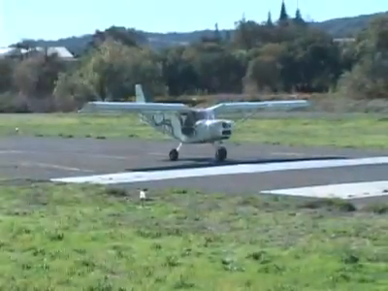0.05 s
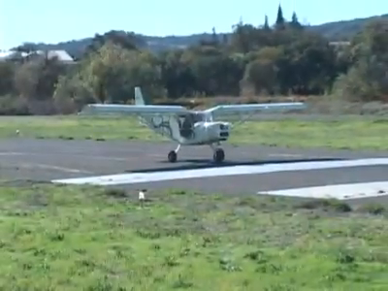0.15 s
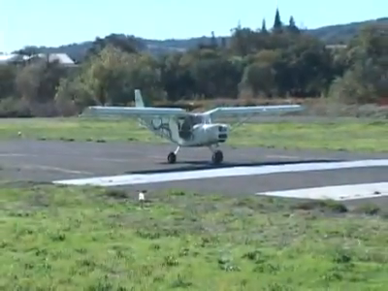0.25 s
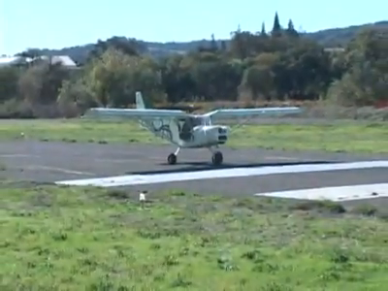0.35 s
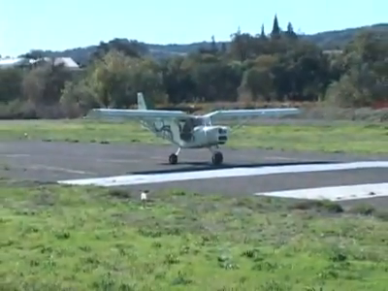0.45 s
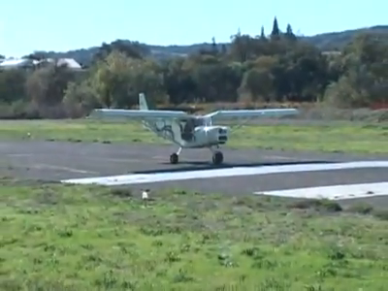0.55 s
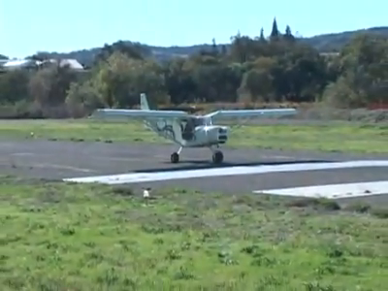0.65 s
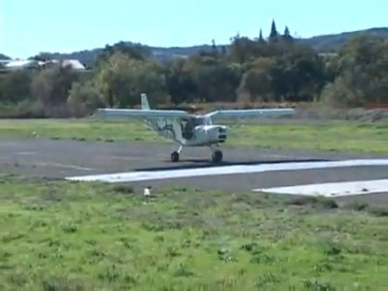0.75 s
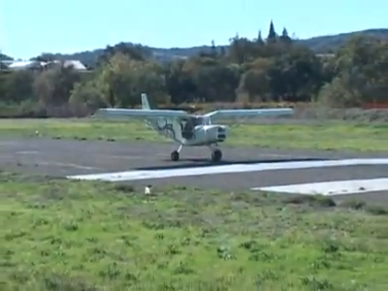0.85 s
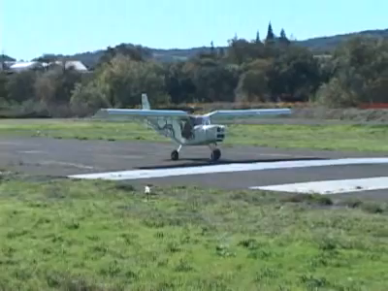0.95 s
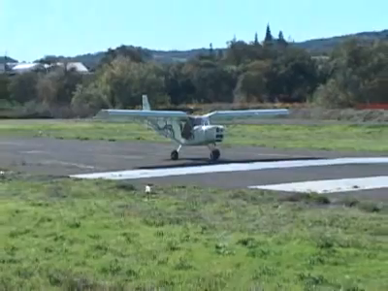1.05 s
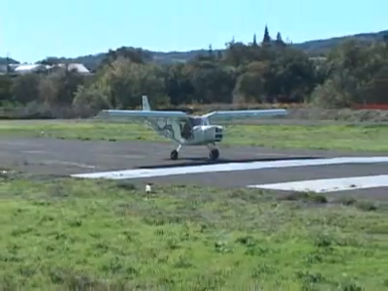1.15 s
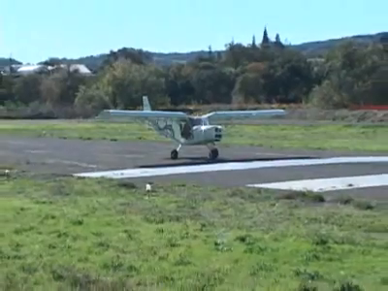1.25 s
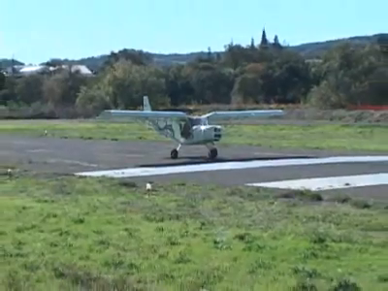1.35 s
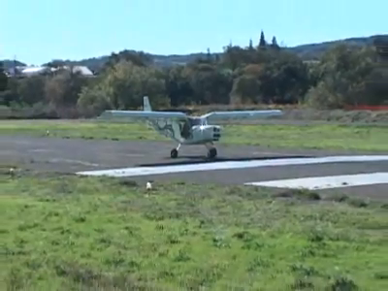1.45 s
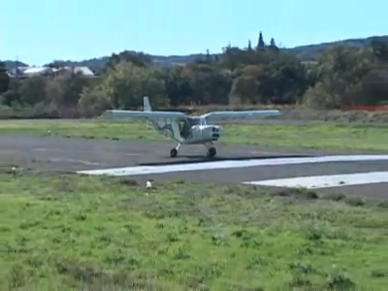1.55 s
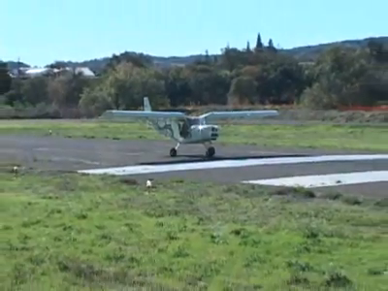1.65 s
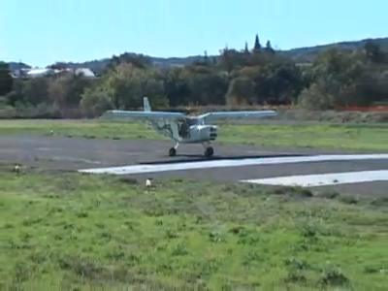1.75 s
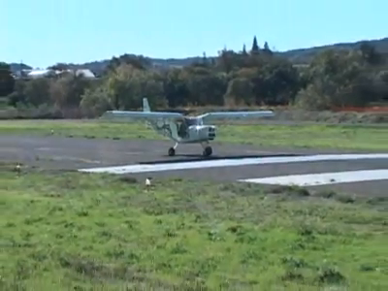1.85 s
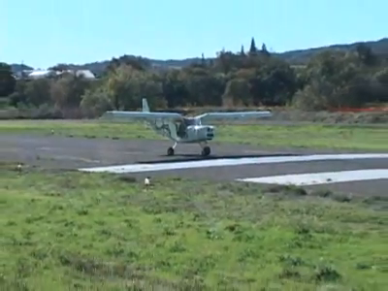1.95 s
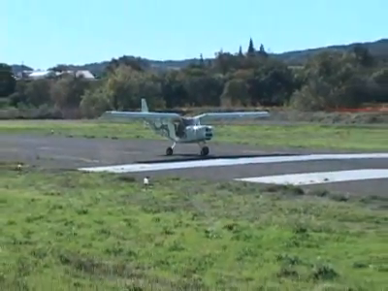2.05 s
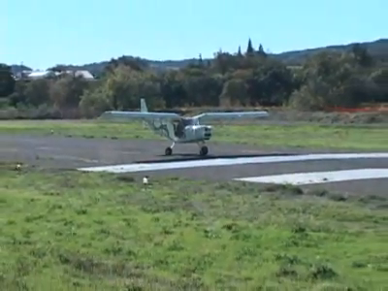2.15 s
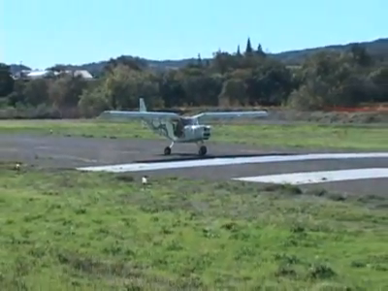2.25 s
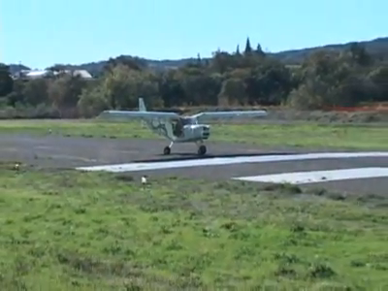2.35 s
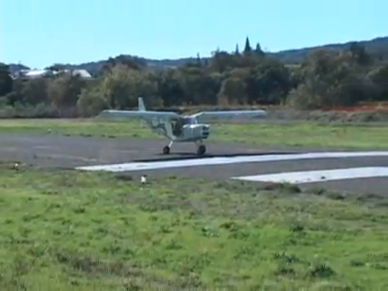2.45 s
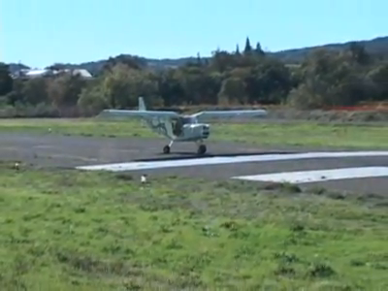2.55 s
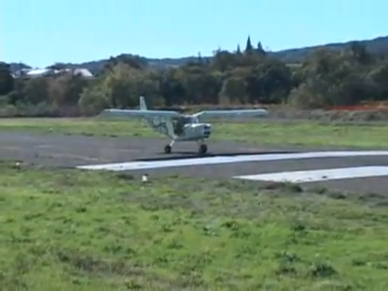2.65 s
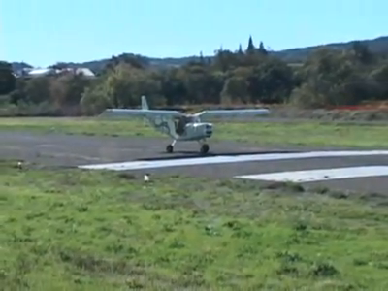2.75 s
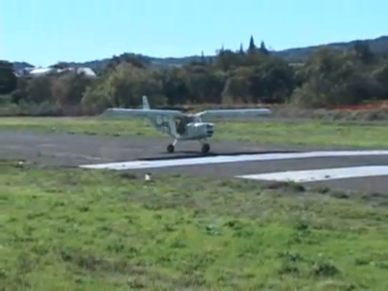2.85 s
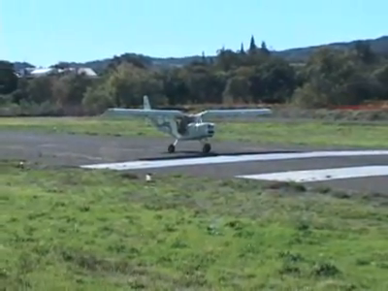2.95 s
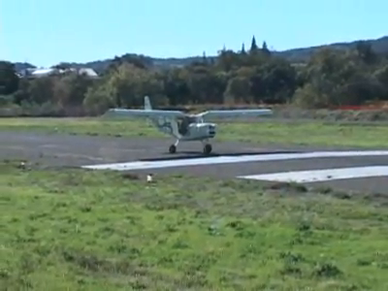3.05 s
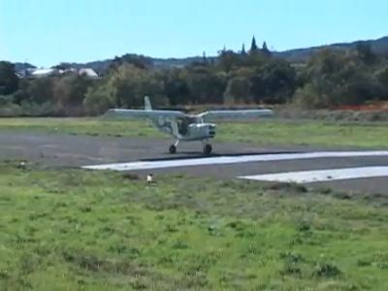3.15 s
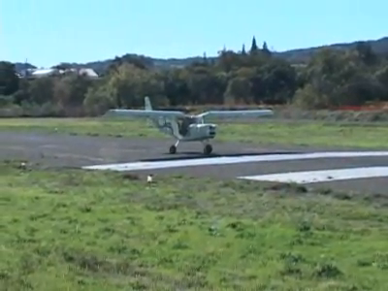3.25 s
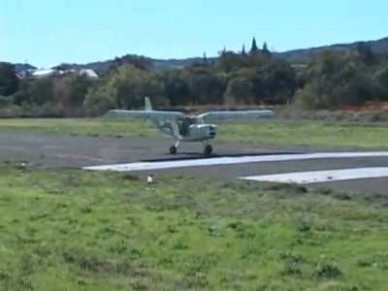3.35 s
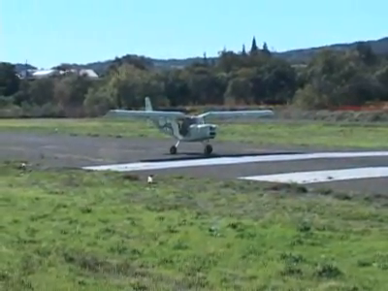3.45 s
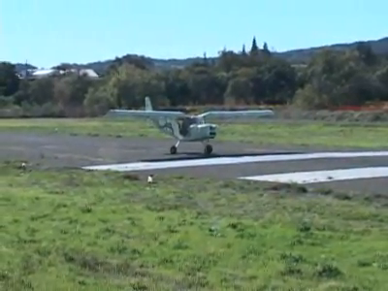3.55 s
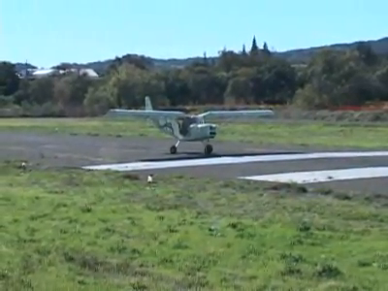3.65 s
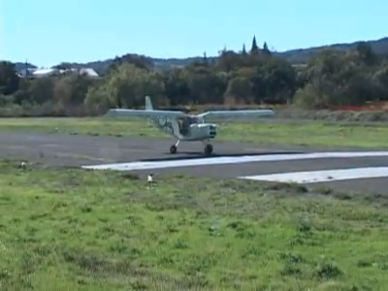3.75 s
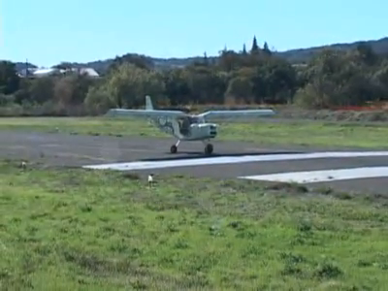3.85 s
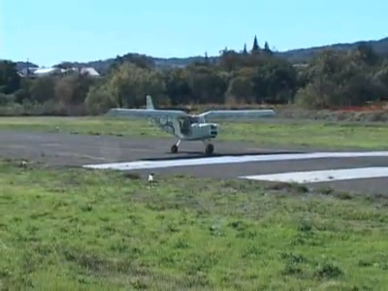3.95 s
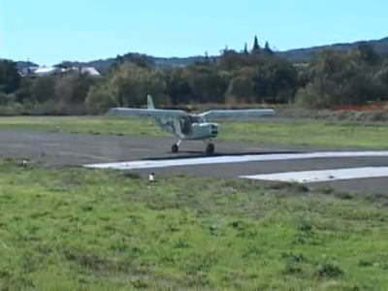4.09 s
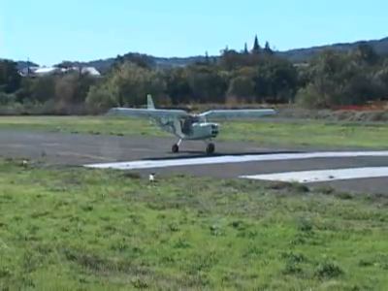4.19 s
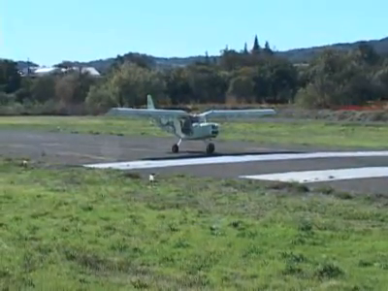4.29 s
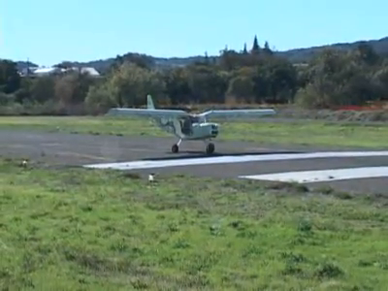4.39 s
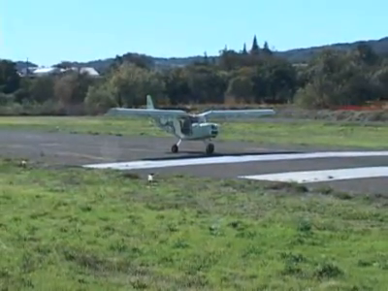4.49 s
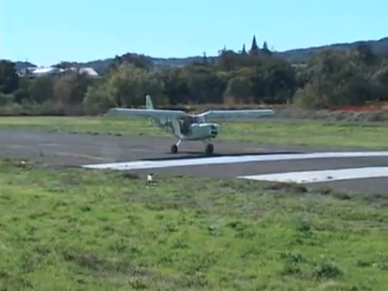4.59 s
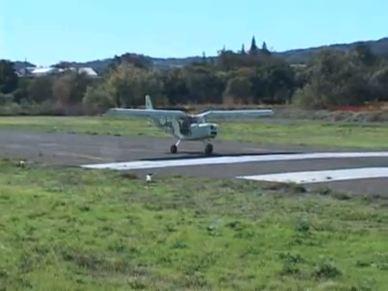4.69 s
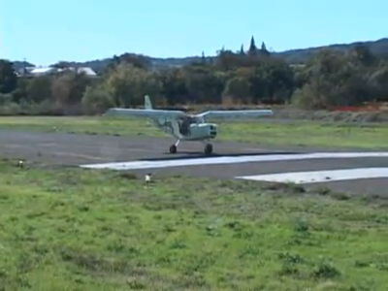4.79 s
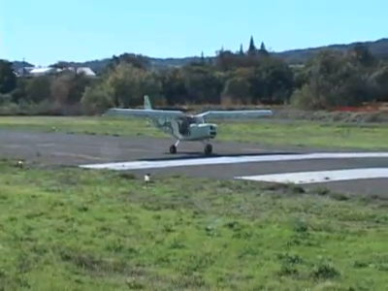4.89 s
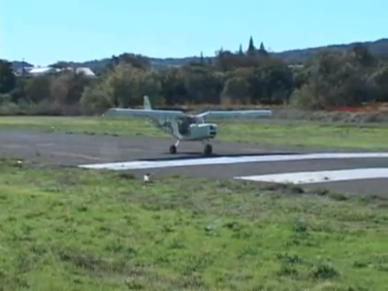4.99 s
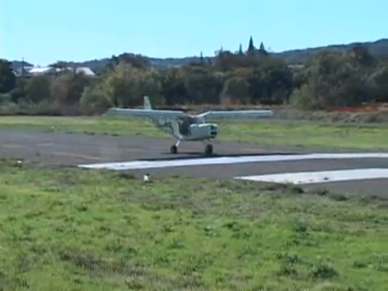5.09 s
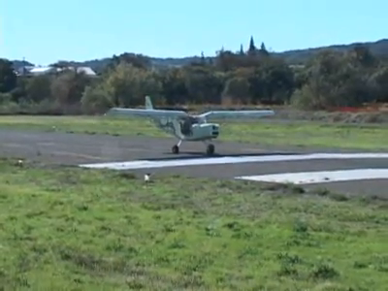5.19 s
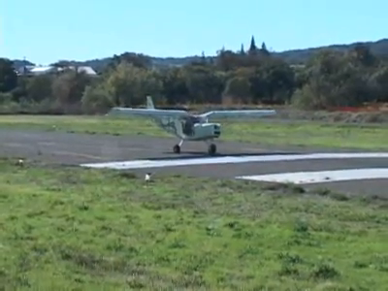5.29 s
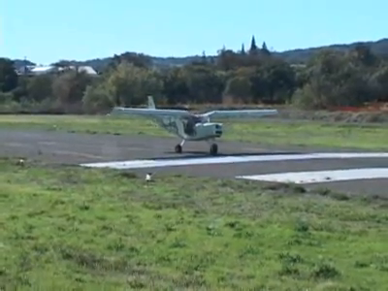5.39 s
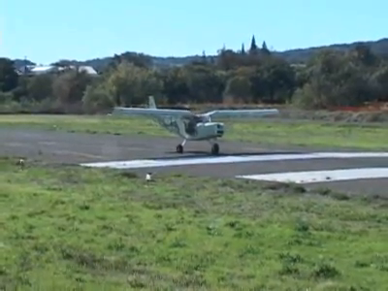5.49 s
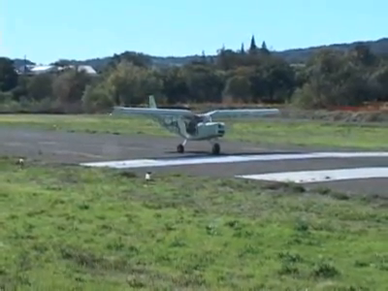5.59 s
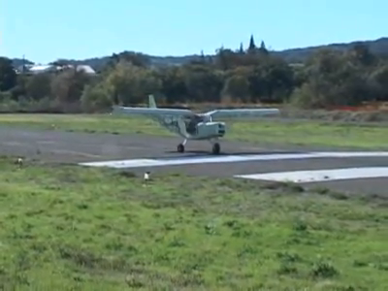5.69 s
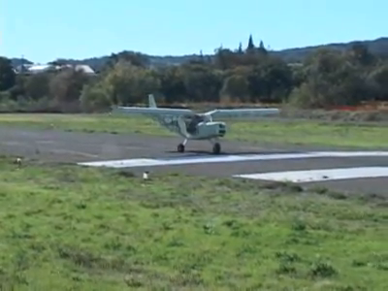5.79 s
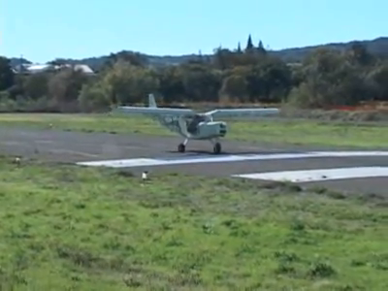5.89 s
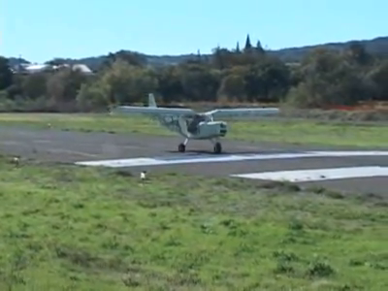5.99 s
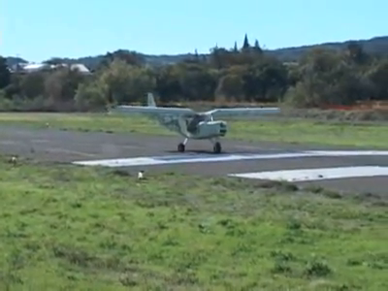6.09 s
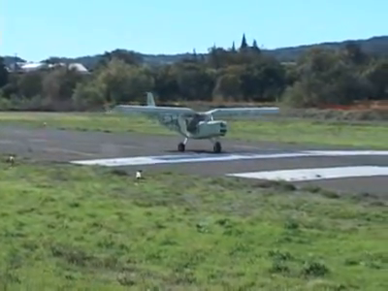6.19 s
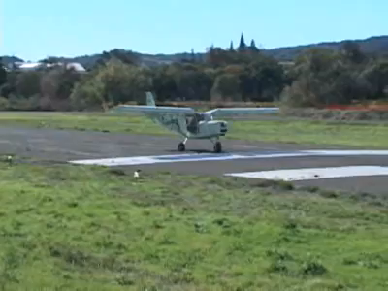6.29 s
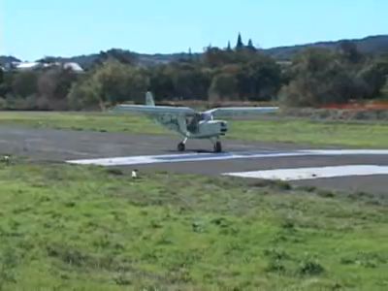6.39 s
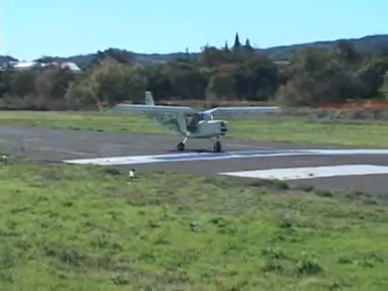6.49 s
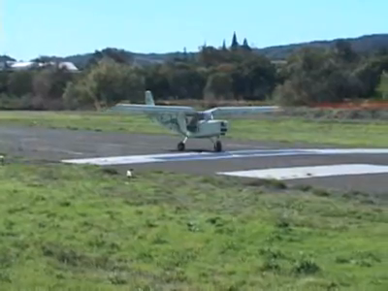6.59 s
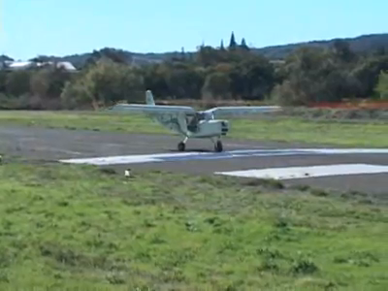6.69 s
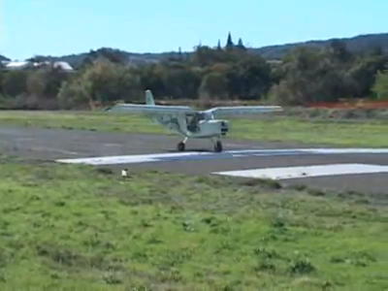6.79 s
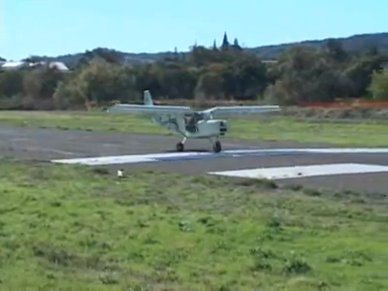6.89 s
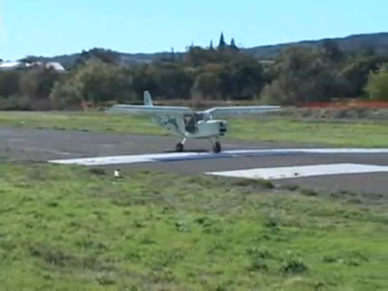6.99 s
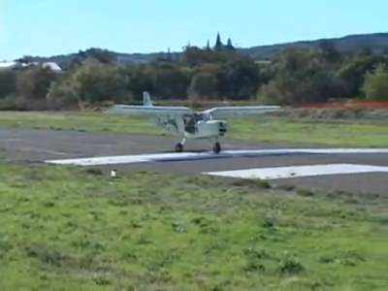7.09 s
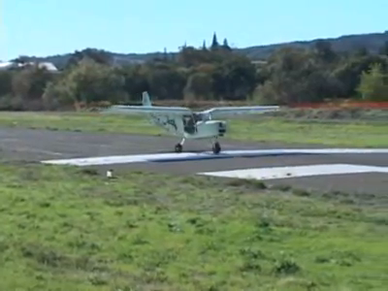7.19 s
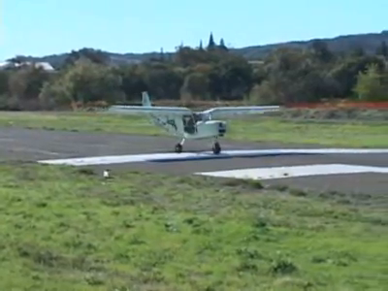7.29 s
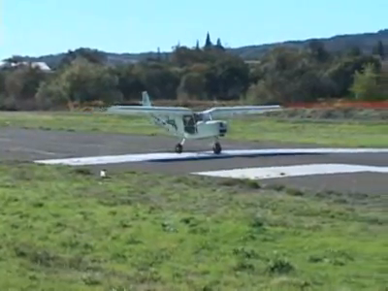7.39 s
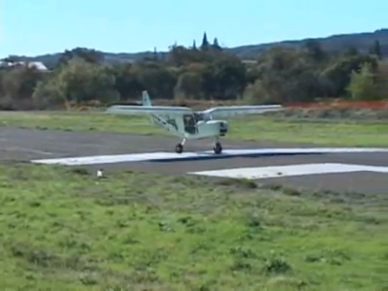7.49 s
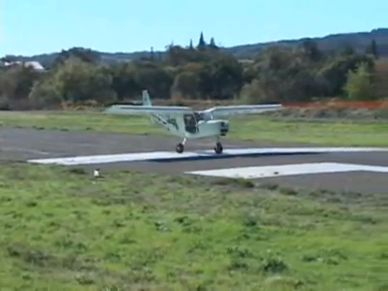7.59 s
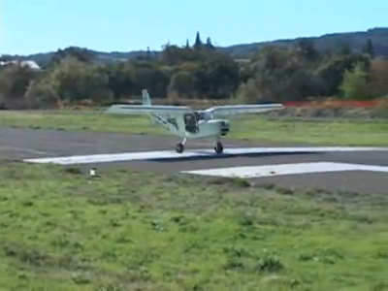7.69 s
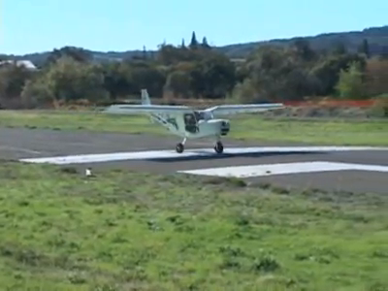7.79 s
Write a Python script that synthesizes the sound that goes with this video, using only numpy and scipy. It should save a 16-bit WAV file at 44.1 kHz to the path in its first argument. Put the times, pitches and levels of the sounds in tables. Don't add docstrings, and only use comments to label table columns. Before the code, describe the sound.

Wind rumbles against a small camera microphone while a distant light aircraft idles with a low, throbbing rush. The engine then accelerates steadily, its whine and drone rising until rapid propeller slaps burst out, rough and briefly overloaded. The pitch levels off at full power; the slapping softens and a buzzing gear whine comes forward, still droning at the end. Open grass, muffled treble.

```python
import sys
import numpy as np
from scipy import signal
from scipy.fft import rfft, irfft, next_fast_len
from scipy.io import wavfile
from scipy.ndimage import uniform_filter1d

SR = 44100
rng = np.random.default_rng(int(sys.argv[2]) if len(sys.argv) > 2 else 0)


def rack_gain(trim_db):
    fader = np.asarray(trim_db, float)
    return 10 ** (fader / 20)


def wrap_up_sound(samples):
    columns = np.atleast_2d(samples).T
    tamed = np.clip(columns, -1, 1)
    steps = np.round(tamed * 32767).astype(np.int16)
    wavfile.write(sys.argv[1], SR, steps)


N = 345744
TIME = np.arange(N) / SR
STEP = 32
SLOW = TIME[::STEP]
SIZE = next_fast_len(N + 8192)
FREQ = np.arange(SIZE // 2 + 1) * SR / SIZE
FULL_HZ = 42
PINION_TEETH, WHEEL_TEETH, BLADES = 21, 51, 3


def curve(table):
    s, *columns = np.transpose(table)
    return [np.interp(TIME, s, c) for c in columns]


def shape_db(table, hz):
    f, db = np.transpose(table)
    return np.interp(np.log(np.maximum(hz, 1)), np.log(f), db)


def unit(x):
    return x / np.sqrt(np.mean(x ** 2))


def walk(rate):
    hold = int(SR / STEP / rate)
    levels = np.repeat(rng.standard_normal(len(SLOW) // hold + 1), hold)
    slewed = uniform_filter1d(uniform_filter1d(levels, hold), hold)
    return unit(slewed[:len(SLOW)])


def fine(slow):
    return np.interp(TIME, SLOW, slow)


def partial(turns, db, turn):
    return fine(rack_gain(db)) * np.cos(2 * np.pi * turns + fine(turn))


def band(spectrum, hz, octaves):
    away = np.clip(np.log2(np.maximum(FREQ, 1) / hz) / octaves, -1, 1)
    return irfft(spectrum * np.cos(np.pi * away / 2) ** 2, SIZE)[:N]


# time in seconds, lift in dB, sign of the pressure pulse.
HARD_SLAPS = [(4.788, 1, -1), (5.0253, -1, -1), (5.1114, 2, 1), (5.1326, 1, 1), (5.1522, -2, -1),
              (5.1729, 0, -1), (5.2549, 1.5, -1), (5.2753, 2, -1), (5.3564, 0, -1), (5.417, 3.5, -1),
              (5.4368, 1.5, -1), (5.5169, -2, -1), (5.5373, -7, -1), (5.5569, 2, -1), (5.5766, 2, -1),
              (5.6162, 3, -1), (5.6362, 0, -1), (5.6557, 1, -1), (5.7351, 0, -1), (5.8135, -6, 1),
              (5.8341, 2, 1), (5.9725, -6, 1), (6.0111, 2.5, 1), (6.0684, 0, 1), (6.0878, 2, 1),
              (6.1267, -3, 1), (6.1656, 1, 1), (6.2432, -6, 1), (6.3011, -2, 1), (6.4182, 1.5, 1),
              (6.5147, -1, 1), (6.534, 1.5, 1), (6.6293, -1, 1), (6.668, 1, 1), (6.687, 4, 1),
              (6.706, 1, 1), (6.7443, -1, 1), (6.8205, 1, 1), (6.8964, 3, 1), (7.0708, 5, 1)]


def arrival(passes):
    s = np.transpose(HARD_SLAPS)[0]
    late = np.interp(TIME, s, np.unwrap(-np.interp(s, TIME, passes), period=1))
    return passes + uniform_filter1d(late, SR // 5)


# partial of the blade rate, level in dB.
SLAP_TONE = [(1, -1), (2, -2), (3, -2), (4, -1), (5, 1.5), (7, .5), (10, 1.5), (14, -1), (24, 0), (32, -3),
             (45, -13)]
# time in seconds, level of one partial in dB.
SLAP_LEVEL = [(0, -69), (2.8, -64.5), (3.4, -64), (4.4, -55.5), (4.8, -44.5), (5.1, -39), (5.3, -42),
              (5.65, -41), (5.9, -38.5), (6.2, -42), (6.4, -42), (6.75, -42.5), (6.95, -47.5), (7.4, -51),
              (7.84, -57)]
# time in seconds, lift of the low partials in dB.
SLAP_DULL = [(0, 10), (3, 5), (4, 1.5), (5.1, -0.5), (5.55, -0.5), (5.8, 2.5), (6.15, 0), (6.3, 7),
             (6.8, 8), (6.95, 5), (7.15, 8.5), (7.4, 5), (7.84, -4.5)]
# time in seconds, lift in dB.
CARRY = [(0, -10), (.2, -6), (.5, -2.5), (.85, 1.5), (1.3, 2.5), (2.3, 0), (3.2, 2), (4, 0.5), (4.45, 0),
         (4.95, 1), (5.35, 6), (5.55, 7.5), (5.75, 6), (5.95, 3), (6.9, 1.5), (7.4, 0), (7.7, 2.5),
         (7.84, 3)]
# time in seconds, centre in Hz, lift in dB.
ECHO_PEAK = [(4.6, 380, 2), (4.92, 400, 2.5), (5.0, 443, 4), (5.07, 400, 6), (5.12, 423, 12.5),
             (5.16, 450, 3), (5.22, 450, 5), (5.28, 475, 6), (5.36, 470, 6), (5.45, 384, 7),
             (5.6, 500, 10.5), (5.75, 516, 4), (5.9, 298, -10), (6.05, 448, 11), (6.12, 450, 6),
             (6.22, 500, -3), (6.31, 495, 16.5), (6.4, 520, 2), (6.49, 430, 10), (6.55, 480, 0),
             (6.65, 320, -3.5), (6.8, 397, 11), (6.95, 427, 6.5), (7.06, 480, 15), (7.15, 480, 5),
             (7.24, 450, 9), (7.3, 470, 12), (7.35, 560, 11), (7.45, 480, -1.5), (7.58, 470, 13.5),
             (7.63, 470, 9), (7.67, 470, 14), (7.72, 470, 10), (7.76, 470, 18), (7.84, 470, 8)]
# time in seconds, lift in dB.
UPPER_LOBE = [(4.9, 5), (5.05, 2.5), (5.2, 7.5), (5.35, 10), (5.45, -4), (5.65, 10.5), (5.8, -1), (6.2, 3),
              (6.4, 4), (6.55, 4), (6.65, 5), (6.9, -0.5), (7.84, -3.5)]
# time in seconds, phase scatter in radians.
SMEAR = [(4.4, .15), (4.9, .6), (5.03, .2), (5.09, .7), (5.14, .2), (5.2, .4), (5.26, .1), (5.31, .7),
         (5.4, .1), (5.47, .6), (5.6, .1), (5.7, .8), (5.8, 1), (5.95, 1.1), (6.02, .2), (6.09, .3),
         (6.2, 1.2), (6.39, 1.3), (6.42, .6), (6.48, 1.3), (6.52, .2), (6.61, .9), (6.68, 0), (6.74, .2),
         (6.8, .8), (6.9, .1), (7.0, .9)]


def slaps(passes):
    s, lift_db, sign = np.transpose(HARD_SLAPS)
    near = np.exp(-((SLOW[:, None] - s) / .006) ** 2)
    calm = 1 - np.exp(-((SLOW[:, None] - s) / .04) ** 2).max(axis=1)
    passes = passes + fine(.003 * calm * walk(14))
    pass_hz = uniform_filter1d(np.gradient(passes[::STEP]) * SR / STEP, size=99)
    roll = np.interp(SLOW, s, np.pi * (sign < 0)) + .3 * calm * walk(4)
    lead = 2.6

    mid_db, dull_db, carry_db = (curve(c)[0][::STEP] for c in (SLAP_LEVEL, SLAP_DULL, CARRY))
    low_db = mid_db + dull_db
    high_db = mid_db - 10.5 + .8 * np.maximum(carry_db, -3)
    echo_hz, echo_db = (c[::STEP] for c in curve(ECHO_PEAK))
    smear, upper_db = curve(SMEAR)[0][::STEP], curve(UPPER_LOBE)[0][::STEP]
    out = 0
    for k in range(1, 46):
        if k % 3 == 1:
            fade_db = min(.3 + .08 * k, 2.1) * walk(5)
            turn = roll + min(.05 + .02 * k, .45) * walk(5)
            turn = turn + np.clip((k - 5) / 11, 0, 1) * smear * walk(4)
        to_mid, to_high = np.interp(k, (5, 9), (0, 1)), np.interp(k, (11, 18), (0, 1))
        db = low_db + to_mid * (mid_db - low_db) + to_high * (high_db - mid_db)
        db = db + shape_db(SLAP_TONE, k) + fade_db
        db = db + upper_db * np.exp(-((k * pass_hz - 730) / 85) ** 2)
        db = db + echo_db * np.exp(-((k * pass_hz - echo_hz) / 40) ** 2)
        phase = turn + lead * np.exp(-(k / 4.5) ** 2) - .0025 * smear * k * k
        out = out + partial(k * passes, db, phase)
    return np.sqrt(2) * out * fine(rack_gain(0.41 * walk(45) + near @ lift_db))


# level at full speed in dB, and growth in dB per doubling of speed.
RUSH_FULL_DB, RUSH_DB_PER_OCTAVE = (-26.5, -29.5, -51), (17.5, 20, 23)
# low, mid and treble in dB per squared doubling.
RUSH_BEND_DB = (-8.5, -4, 0)
CARRY_SHARE = (0.44, 1, 1.25)


def roar(crank_hz):
    octaves, carry_db = np.log2(crank_hz / FULL_HZ), curve(CARRY)[0]
    levels = []
    for db, rise, bend_db, share in zip(RUSH_FULL_DB, RUSH_DB_PER_OCTAVE, RUSH_BEND_DB, CARRY_SHARE):
        levels.append(db + rise * octaves + bend_db * octaves * (octaves + 1.1) + share * carry_db)
    return levels


# frequency in Hz, level in dB per Hz.
RUSH_COLOUR = [(100, -7), (150, -2), (190, -9.5), (290, -4.5), (400, -1.5), (500, -2), (600, -4.5),
               (784, -10.5), (1130, -8), (1370, -12), (1610, -15), (2140, -14), (2600, -20)]
# frequency in Hz, lift in dB.
IDLE_TINT = [(100, -1), (200, 1.5), (300, 5.5), (570, -6), (800, 3.5), (1130, 0), (2260, -1.5), (4500, 0.5)]
# time in seconds, lift in dB.
SHEEN = [(0, 1), (4.9, 0), (5.25, -0.5), (5.45, -4), (5.55, -1), (5.68, -1), (5.8, -2.5), (6.5, -1),
         (7.2, -3), (7.4, 0), (7.5, 2), (7.84, -0.5)]


def slipstream(passes, low_db, mid_db, treble_db):
    throb = .68 - .0095 * np.gradient(passes) * SR
    puff = np.exp(throb * np.cos(2 * np.pi * passes - .5))
    puff = puff * fine(rack_gain(1.0 * walk(28)))
    colour = rack_gain(shape_db(RUSH_COLOUR, np.minimum(FREQ, 2500.)))
    puffed = rfft(unit(puff * rng.standard_normal(N)), SIZE) * colour
    even = rfft(unit(rng.standard_normal(N)), SIZE) * colour
    scale = 1 / np.std(band(even, 400, 1.2))
    idle = np.clip(2 - np.gradient(passes[::STEP]) * SR / STEP / 16, 0, 1)
    flutter_db = curve(SHEEN)[0][::STEP] + 0.66 * walk(40)
    out, shared = 0, walk(3.9)
    for hz in 100 * 2 ** np.arange(0, 7, .5):
        to_mid, to_treble = np.clip(np.log2(hz / 500), 0, 1), np.clip(np.log2(hz / 2500), 0, 1)
        db = (1 - to_mid) * (low_db - 8.0) + to_mid * (1 - to_treble) * (mid_db - 3.5)
        db = db + to_treble * (treble_db + 19)
        shared = .6 * shared + .8 * walk(6)
        swell_db = 0.29 * shared + 0.53 * walk(30) + (hz > 3500) * flutter_db
        swell_db = swell_db + idle * shape_db(IDLE_TINT, hz)
        depth = np.clip(.9 - 0.56 * to_treble, 0, 1)
        mixed = depth * puffed + np.sqrt(1 - depth ** 2) * even
        out = out + rack_gain(db + fine(swell_db)) * band(mixed, hz, 0.57)
    return scale * out


# multiple of crank speed, level in dB.
EXHAUST = [(1, -20), (1.5, -20), (2, 0), (2.5, -16), (3, -9), (3.5, -11), (4, -26), (6, -24)]
# crankshaft speed in Hz, level in dB.
DRONE_BY_SPEED = [(18.9, -54), (20.5, -50), (28, -48), (31, -41), (34.6, -34), (38.8, -27), (40, -26.3),
                  (42.3, -27.6)]


def exhaust(turns, crank_hz):
    out = 0
    for k, db in EXHAUST:
        out = out + partial(k * turns, db + .6 * walk(5), .2 * walk(6) + k * k)
    return rack_gain(np.interp(crank_hz, *np.transpose(DRONE_BY_SPEED))) * np.sqrt(2) * out


# time in seconds, level in dB.
WHINE = [(0, -77), (2, -67), (2.35, -64), (2.5, -59), (3.0, -57), (3.5, -56), (3.65, -61), (4.1, -58),
         (4.35, -52), (4.55, -53), (4.8, -56), (5.5, -53), (6.2, -60), (6.9, -56), (7.1, -47), (7.84, -45)]
# centre in Hz, width in Hz, level in dB.
HOUSING = [(935, 40, -2), (1400, 300, -3), (1960, 460, 0), (2350, 400, -12)]


def gear(turns, crank_hz):
    speed_hz = crank_hz[::STEP]
    rattle = 2.95 - 2.55 * speed_hz / FULL_HZ
    out = 0
    for k in range(1, 7):
        for side, side_db in ((0, 1.5), (1, 2.5 if k == 1 else -5)):
            order = k * PINION_TEETH + side
            gain = 0
            for hz, width, db in HOUSING:
                gain = gain + rack_gain(db) / (1 + (2 * (order * speed_hz - hz) / width) ** 4)
            mesh_db = 20 * np.log10(gain) + side_db + 1.3 * walk(12)
            out = out + partial(order * turns, mesh_db, rattle * walk(75))
    out = out * (1 + .4 * partial(turns, 0 * SLOW, walk(8)))
    return rack_gain(curve(WHINE)[0]) * np.sqrt(2) * out


# frequency in Hz, level in dB per Hz.
BUFFET = [(12, -23.5), (22, 2), (60, 0), (110, -4.5), (160, -14), (230, -27), (400, -41)]
# time in seconds, lift in dB.
GUSTS = [(.04, -0.5), (.2, 1.5), (.7, -6), (.84, -4), (.98, -3), (1.09, 2), (1.83, -1.5), (2.1, 0),
         (2.53, 1.5), (2.79, 3.5), (3.33, -5), (3.48, 2), (3.61, 1), (3.9, 3), (3.97, -0.5), (4.08, 3),
         (4.15, -1), (4.24, 9), (4.72, 2), (5.33, 5.5), (5.5, -2), (5.81, 3), (5.98, 7.5), (6.04, -7.5),
         (6.92, 6.5), (6.97, -4.5), (7.27, 0.5), (7.43, -7), (7.49, 5)]


def wind():
    lumps = rng.standard_normal(N) * fine(rack_gain(1.0 * walk(13)))
    thuds = irfft(rfft(lumps, SIZE) * rack_gain(shape_db(BUFFET, FREQ)), SIZE)[:N]
    s, lift_db = np.transpose(GUSTS)
    gust_db = np.exp(-((SLOW[:, None] - s) / 0.09) ** 2) @ lift_db
    breeze_db = -40 + 0.2 * SLOW
    return unit(thuds) * fine(rack_gain(breeze_db + gust_db + 2.5))


# time in seconds, crankshaft speed in turns per second (Hz).
CRANK = [(0.0, 18.86), (0.9, 19.0), (1.5, 19.45), (1.8, 19.87), (2.4, 21.11), (3.0, 22.17), (3.3, 23.37),
         (3.9, 26.68), (4.5, 32.37), (4.65, 34.59), (4.95, 37.45), (5.1, 38.49), (5.4, 40.08), (5.7, 41.0),
         (6.0, 41.55), (6.25, 41.87), (7.0, 42.24), (7.84, 42.34)]


def scene():
    crank_hz = curve(CRANK)[0]
    turns = np.cumsum(crank_hz) / SR
    passes = arrival(turns * BLADES * PINION_TEETH / WHEEL_TEETH)
    aircraft = slaps(passes) + slipstream(passes, *roar(crank_hz))
    aircraft = aircraft + exhaust(turns, crank_hz) + gear(turns, crank_hz)
    return (aircraft + wind())[None]


def band_limit(x):
    return signal.sosfilt(signal.butter(12, 13300, fs=SR, output="sos"), x)


# frequency in Hz, level in dB.
MIC_TOP = [(1410, -30), (2400, 2), (2780, -4), (3140, -0.5), (3550, -15), (3960, -10.5), (4300, -19.5),
           (4570, -17), (4750, -8.5), (5170, -20.5), (5440, -12), (5700, -15), (6100, -19.5), (6700, -24.5),
           (7100, -34), (7830, -38.5), (10200, -73.5), (17200, -120)]
# time in seconds, level in dB.
OVERLOAD = [(4.919, -62), (5.1326, -44), (5.2549, -58), (5.3563, -35), (5.4169, -37), (5.5569, -43),
            (5.632, -47), (5.637, -44), (5.643, -48), (6.633, -56), (6.64, -56), (6.662, -53), (6.668, -51)]


def record(dry):
    full_scale, top_hz = .366, 7980
    top_db = np.where(FREQ > 2500, shape_db(MIC_TOP, FREQ) - shape_db(MIC_TOP, 2500.), 0)
    heard = irfft(rfft(dry, SIZE) * rack_gain(top_db), SIZE)[:, :N]
    heard = np.clip(heard, -full_scale, full_scale)
    busy = np.clip(uniform_filter1d(np.abs(heard[0, ::STEP]), size=300) / .05, 0, 1)
    hiss = rfft(rng.standard_normal(N), SIZE) * rack_gain(-78.5) * (FREQ > 6500)
    spectrum = rfft(heard, SIZE) * (FREQ < top_hz) + hiss * (FREQ < 8300)
    heard = irfft(spectrum * (FREQ < 7100), SIZE)[:, :N] + rack_gain(-100) * rng.standard_normal(N)

    for hz in range(7100, 8300, 150):
        kept = walk(18) > 2.2 * busy - 2.5 + (hz - 7100) / 800
        strip = irfft(spectrum * (FREQ >= hz) * (FREQ < hz + 150), SIZE)[:, :N]
        heard = heard + fine(uniform_filter1d(1. * kept, size=12)) * strip

    for hz in 8500 + 3500 * rng.random((14, 2, 1)):
        kept = walk(24) > .6 + 7 * np.maximum(busy - .3, 0)
        level = uniform_filter1d(1. * kept, size=12) * np.where(SLOW < .93, 1, .6)
        patch = irfft(hiss * (np.abs(FREQ - hz) < 25).any(axis=0), SIZE)[:N]
        heard = heard + fine(level) * patch

    s, db = np.transpose(OVERLOAD)
    ticks = np.bincount(np.round(s * SR).astype(int), rack_gain(db), N)
    return band_limit(heard + ticks)


dry = scene()
out = record(dry)
wrap_up_sound(out)
```